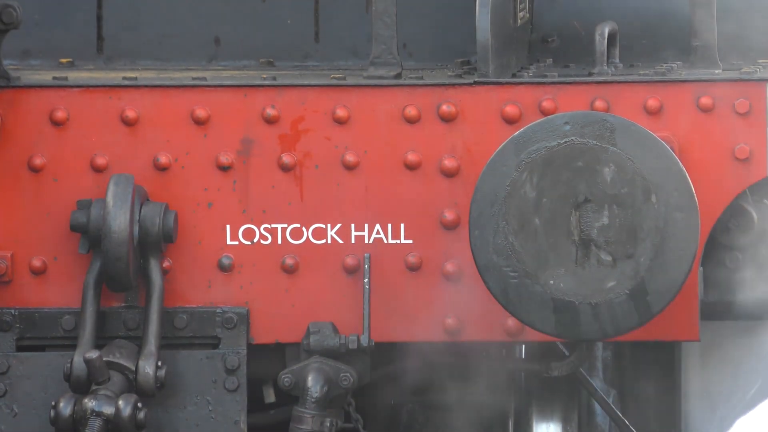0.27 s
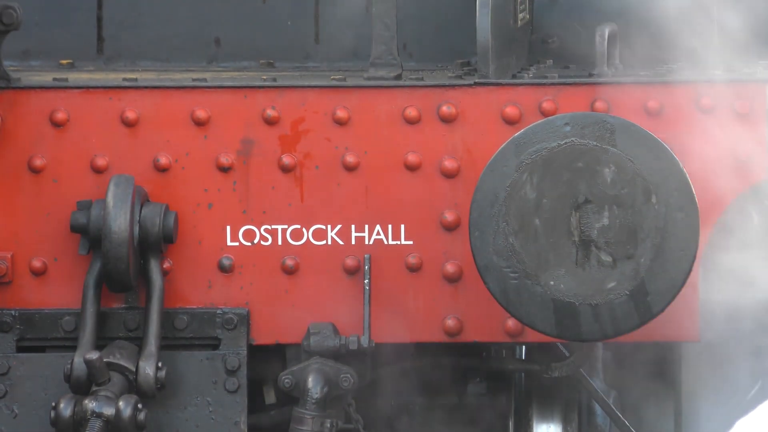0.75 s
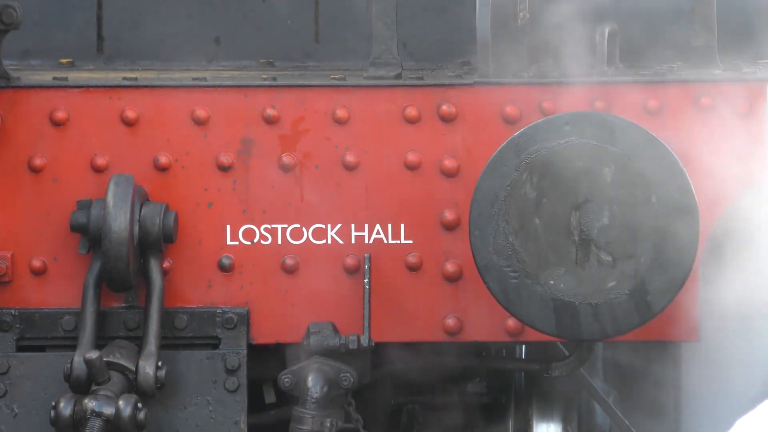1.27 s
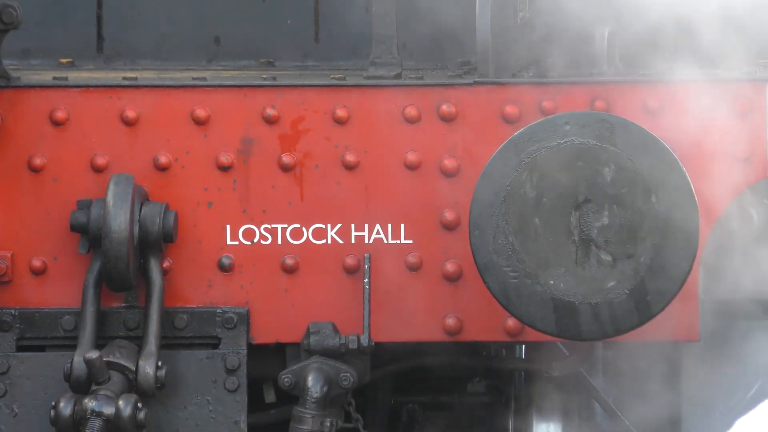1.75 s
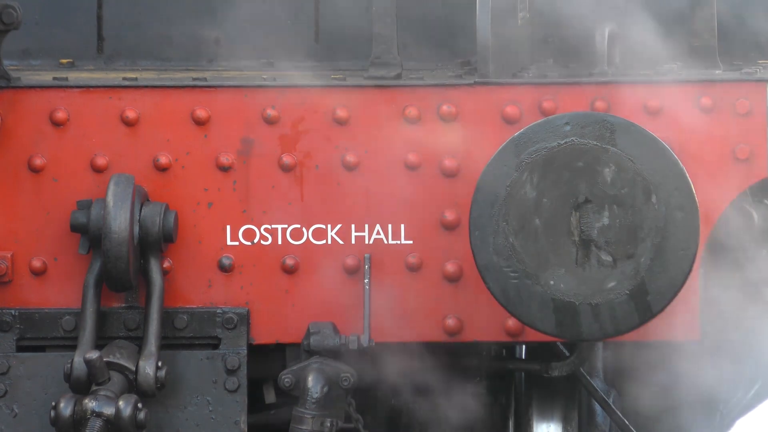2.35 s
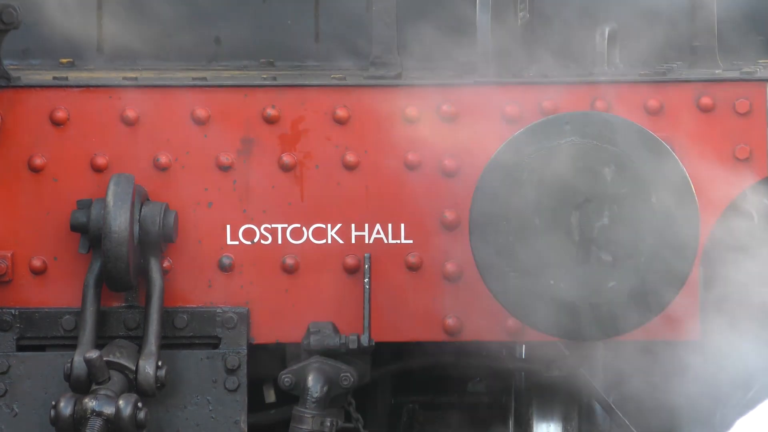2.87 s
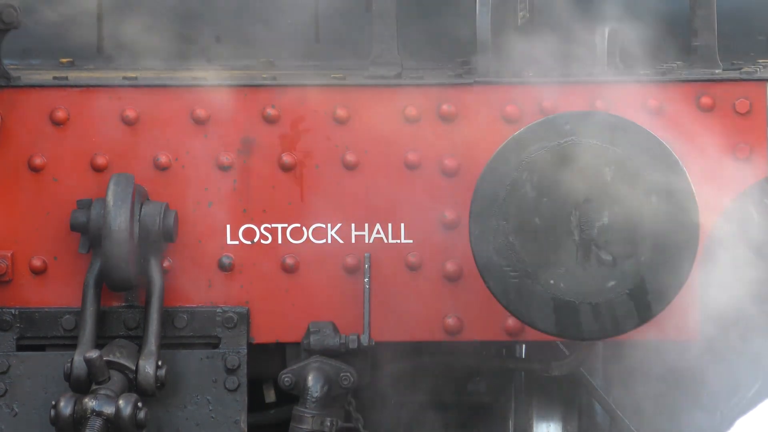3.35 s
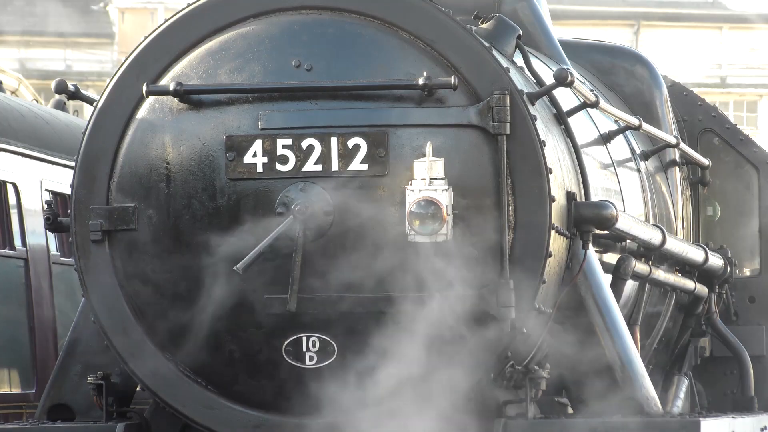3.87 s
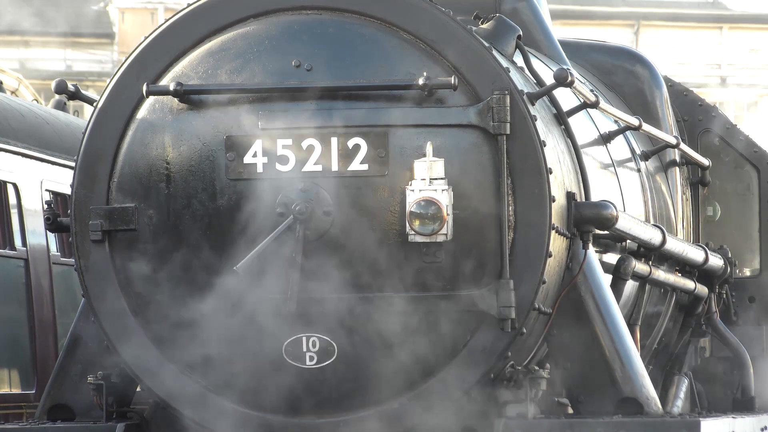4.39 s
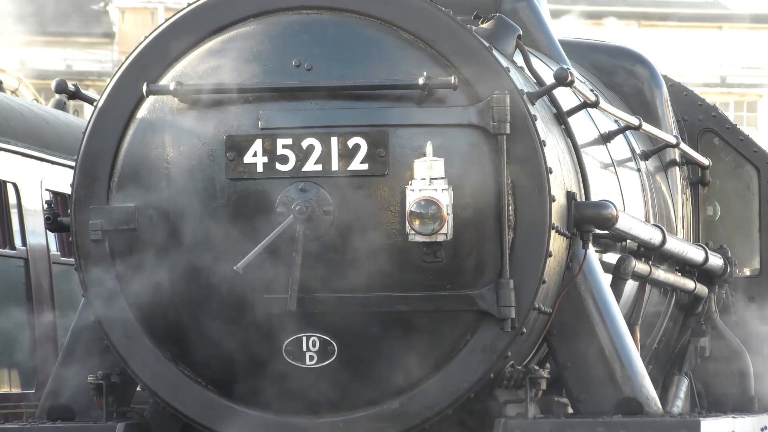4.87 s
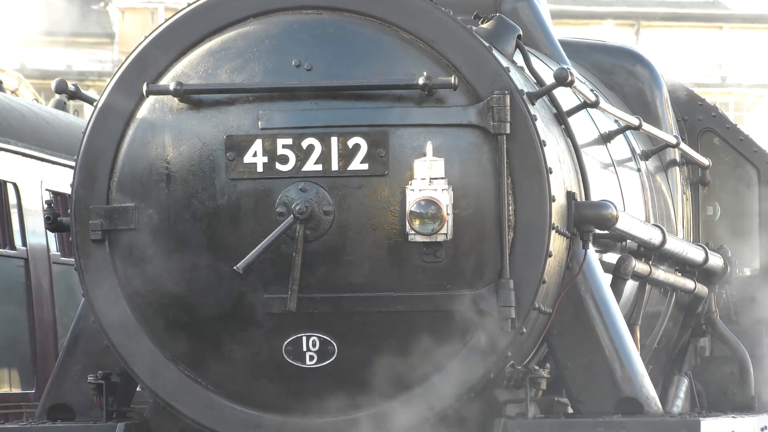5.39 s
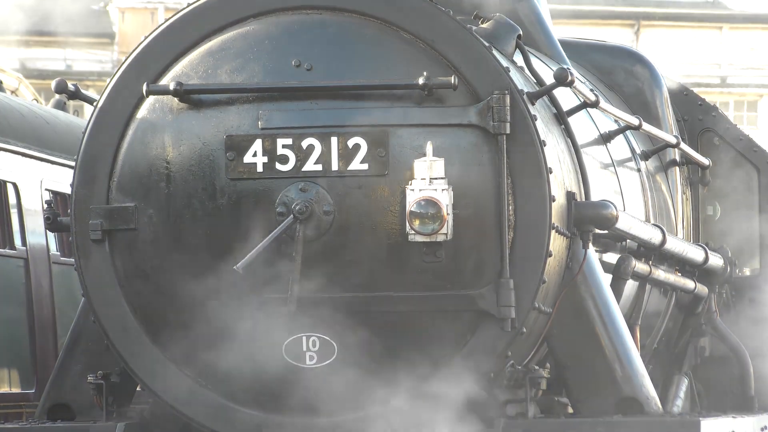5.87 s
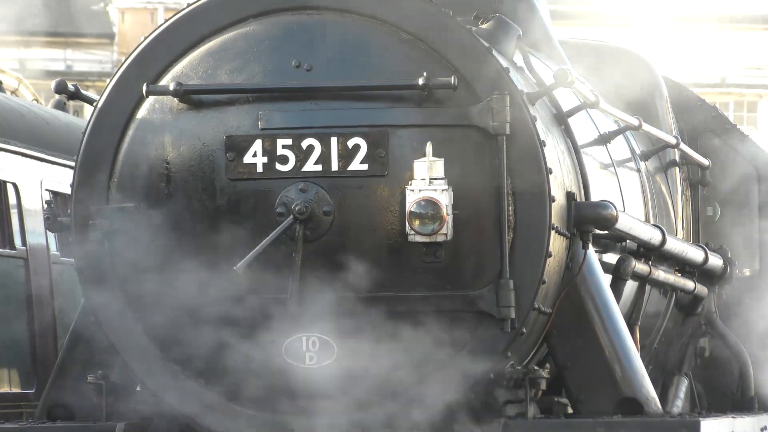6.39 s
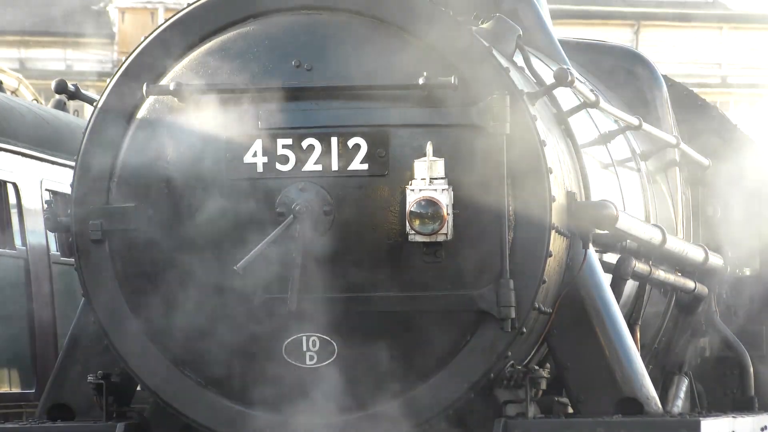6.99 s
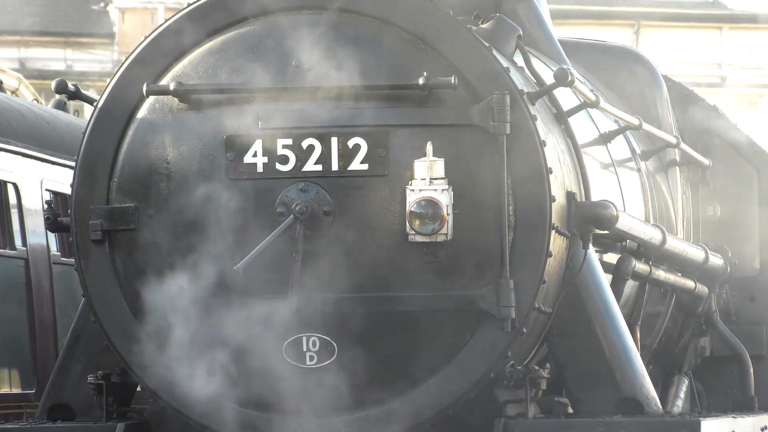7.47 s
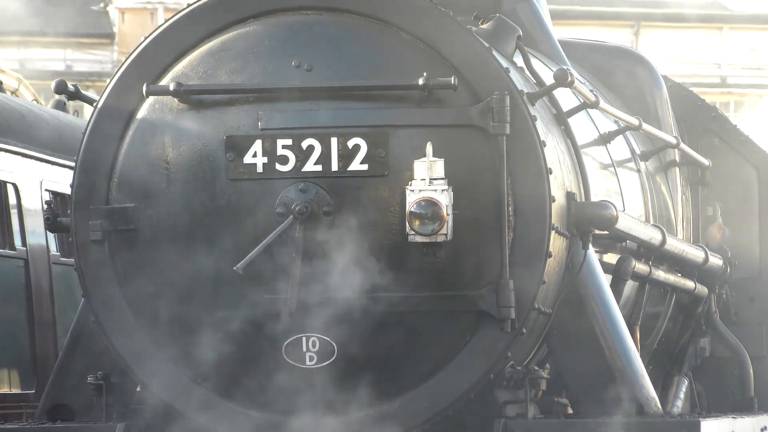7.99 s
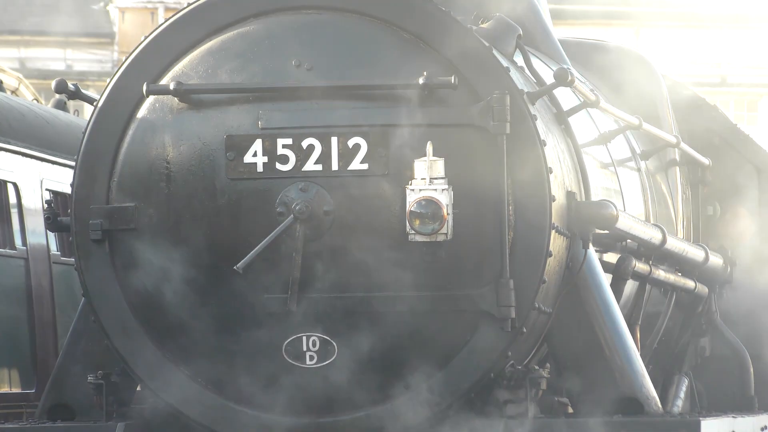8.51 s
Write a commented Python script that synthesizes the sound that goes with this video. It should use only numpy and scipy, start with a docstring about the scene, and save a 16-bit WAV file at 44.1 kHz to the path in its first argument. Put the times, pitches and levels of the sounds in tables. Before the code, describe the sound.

Close to a standing steam locomotive, wet steam hisses and sputters unevenly over a hollow draught roar, while wind buffets the microphone with low thumps.

```python
"""Just ahead of the buffer beam of a steam locomotive that stands in steam.
The draught, noise shaped by cavity resonances, roars hollowly in smokebox and chimney and swells late on.
Wet steam, as resonant noise, broad hiss and spray, spurts unevenly from a drain pipe and spits brief ticks.
Wind buffets the microphone as low-frequency noise and single pressure pulses."""
import sys
import numpy as np
from scipy import signal
from scipy.fft import rfft, irfft, next_fast_len
from scipy.io import wavfile
from scipy.ndimage import uniform_filter1d

SR = 44100
rng = np.random.default_rng(int(sys.argv[2]) if len(sys.argv) > 2 else 0)


def dump_mix(stems):
    """Bounce the given channels to the path in sys.argv[1] as a 16-bit WAV at rate SR."""
    frames = np.atleast_2d(stems).T  # one column per channel
    limited = np.clip(frames, -1, 1)  # hard clip at full scale
    pcm = np.round(limited * 32767).astype(np.int16)
    wavfile.write(sys.argv[1], SR, pcm)


N = 385434
TIME = np.arange(N) / SR   # s

# steady draught through the smokebox: (time [s], relative level [dB])
DRAUGHT_LEVEL = [(0.0, -45.5), (0.45, -45.5), (1.0, -47), (1.65, -50), (1.95, -46.2), (2.3, -46.5),
                 (3.5, -49.5), (4.5, -50.3), (4.85, -46), (5.5, -49.1), (5.95, -49.5), (6.5, -44.8),
                 (7.45, -45), (8.1, -49.5), (8.74, -49)]


def from_db(db):
    """Level and amplitude: 20 dB is a factor of ten in gain."""
    return 10 ** (np.asarray(db) / 20)


def rms_one(x):
    """Normalisation: the mean square is scaled to 1."""
    return x / np.sqrt(np.mean(x ** 2) + 1e-20)


def in_time(rows):
    """Linear interpolation: each column of a curve, sample by sample."""
    times, *columns = np.transpose(rows)
    return [np.interp(TIME, times, column) for column in columns]


def noise(gain_at):
    """Spectral shaping: Gaussian white noise times a gain at each frequency, at rms 1."""
    size = next_fast_len(N, True)
    hz = np.maximum(np.fft.rfftfreq(size, 1 / SR), 1)
    spectrum = rfft(rng.standard_normal(size)) * gain_at(hz)
    return rms_one(irfft(spectrum, size)[:N])


def coloured(spectrum):
    """Broadband turbulence: a smooth spectrum that falls 12 dB per octave beyond its ends."""
    at_hz, density_db = np.transpose(spectrum)

    def gain_at(hz):
        inside = from_db(np.interp(np.log(hz), np.log(at_hz), density_db))
        beyond_ends = np.minimum(1, np.minimum(hz / at_hz[0], at_hz[-1] / hz)) ** 2
        return inside * beyond_ends

    return noise(gain_at)


def passband(hz, centre_hz, width_hz):
    """Resonance: power response, 1 at the centre and one half at the edges of its width."""
    detuning = (hz ** 2 - centre_hz ** 2) / (hz * width_hz)
    return 1 / (1 + detuning ** 4)


def resonant(modes):
    """Cavity resonance: turbulence excites steep-sided modes, whose powers add."""
    def gain_at(hz):
        power = sum(from_db(db) ** 2 * passband(hz, centre_hz, width_hz)
                    for centre_hz, width_hz, db in modes)
        return np.sqrt(power)

    return noise(gain_at)


def drift(rate_hz):
    """Random modulation: low-passed noise wanders slowly with rms 1."""
    step = 100   # samples between the points of the slow curve
    white = rng.standard_normal(N // step + 1)
    hz = np.fft.rfftfreq(len(white), step / SR)
    slow = irfft(rfft(white) / (1 + (hz / rate_hz) ** 2), len(white))
    return np.interp(np.arange(N) / step, np.arange(len(white)), rms_one(slow))


def evened(x, seconds):
    """Envelope division: slow swells of the noise are taken out, so that the flow sets its level."""
    envelope = np.abs(signal.hilbert(x, next_fast_len(N))[:N])
    power = uniform_filter1d(envelope ** 2, max(int(seconds * SR), 1))
    return rms_one(x / np.sqrt(power + 1e-9))


def wandering(modes, depth_db, rate_hz, count):
    """Mode competition: interleaved groups of resonances trade strength while their sum stays even."""
    ringing = 0
    for k in range(count):
        group = modes[k::count]
        share = np.sqrt(sum(width_hz * from_db(db) ** 2 for hz, width_hz, db in group))
        ringing = ringing + share * resonant(group) * from_db(depth_db * drift(rate_hz))
    return evened(ringing, seconds=0.072)


def surging(steady_db, surges, rise_share, roundness=1.1):
    """Power addition: level [dB] of a steady flow plus surges (time [s], peak [dB], dying time [s])."""
    power = from_db(steady_db) ** 2
    for start_s, peak_db, dying_s in surges:
        # distance from the peak in dying times; the rise takes rise_share of that time
        away = np.maximum((start_s - TIME) / rise_share, TIME - start_s) / max(dying_s, 1e-3)
        near = away < 10
        power[near] += (from_db(peak_db) * np.exp(-away[near] ** roundness)) ** 2
    return 10 * np.log10(power)


def wind():
    """Turbulent pressure on a diaphragm: swings and flutter; an eddy is a push between two suctions."""
    # light breeze and its lulls: (time [s], relative level of the slow swings [dB])
    breeze = [(0.0, -57.1), (1.25, -39), (1.5, -47.5), (1.9, -43), (2.5, -38), (3.1, -54), (3.45, -37),
              (4.1, -45), (5.2, -39.5), (6.1, -45), (7.4, -41.8), (8.74, -39.3)]
    # gusts: (time [s], relative swing level [dB], relative flutter level [dB], dying time [s])
    gusts = [(0.01, -23.5, -43, 0.19), (0.46, -34.5, -48.5, 0.31), (0.91, -24, -49.5, 0.06),
             (1.21, -34, -45, 0.058), (1.94, -26, -49, 0.031), (2.12, -26.5, -54, 0.08),
             (3.87, -31, -56, 0.038), (4.38, -32.5, -49, 0.2), (4.69, -29, -49, 0.07),
             (4.89, -31, -49, 0.072), (5.3, -35, -54, 0.06), (5.61, -27.5, -38, 0.13),
             (6.28, -30, -41, 0.036), (6.45, -21, -30, 0.077), (6.63, -19, -32.5, 0.16),
             (6.89, -20.5, -54, 0.08), (7.08, -31.5, -46, 0.18), (7.86, -30.5, -45, 0.064),
             (8.1, -24.5, -32, 0.13), (8.32, -21, -52, 0.11)]
    # slow pressure swings: (frequency [Hz], relative density [dB])
    swing_spectrum = [(5, -17), (10, -2.5), (18, 7.5), (28, -26.5), (42, -20.5), (70, -44), (140, -43.5)]
    # faster flutter: (frequency [Hz], relative density [dB])
    flutter_spectrum = [(22, -18), (45, 2), (60, -5), (85, -13), (115, -21.5), (170, -28), (400, -68)]
    # single eddies that hit the microphone: (time [s], peak level [dB], length [s])
    eddies = [(6.439, -22.5, 0.0051), (8.114, -7, 0.02)]
    rise_share = 0.87   # rise time over dying time
    breeze_flutter_db = -19.5   # against the swings of the breeze

    breeze_db, = in_time(breeze)
    breeze_db = breeze_db + 2.0 * drift(rate_hz=9)
    swing_gusts = [(s, swing, dying) for s, swing, flutter, dying in gusts]
    flutter_gusts = [(s, flutter, dying) for s, swing, flutter, dying in gusts]
    swing_db = surging(breeze_db, swing_gusts, rise_share)
    flutter_db = surging(breeze_db + breeze_flutter_db, flutter_gusts, rise_share)
    pressure = from_db(swing_db + 0.6) * evened(coloured(swing_spectrum), seconds=0.062)
    pressure = pressure + from_db(flutter_db + 1.2) * evened(coloured(flutter_spectrum), seconds=0.16)
    for s, peak_db, length_s in eddies:
        passing = ((TIME - s) / length_s) ** 2
        pressure = pressure + from_db(peak_db) * (1 - 2 * passing) * np.exp(-passing)
    return pressure


def draught():
    """Flow noise in cavities: the fire drones in the boiler, the draught rushes through the smokebox."""
    # drone of the fire: (time [s], relative level [dB])
    fire_level = [(0, -45), (.5, -47), (1.5, -47), (3.5, -47.5), (4.7, -47), (5.5, -45), (6.3, -46.5),
                  (7.5, -45), (8.74, -45.8)]
    # resonances of firebox and boiler: (centre [Hz], width [Hz], relative density [dB])
    boiler_modes = [(211, 50, 1.5), (250.3, 45, -2), (305, 42, -5), (338.4, 28.4, -1), (456.4, 25, -11),
                    (502.6, 6.2, -8.5), (530.4, 31, -10.5), (585, 32, -13)]
    # resonances of the smokebox: (centre [Hz], width [Hz], relative density [dB])
    smokebox_modes = [(677, 18, -0.5), (710, 16, -4), (712, 16, -17), (856, 56, 2.5), (970, 7.6, -18),
                      (1084.4, 37, -0.5), (1149, 67, -4.5), (1197, 48, 0.5), (1327, 36, -12.5),
                      (1448, 46, -15), (1560, 210, -15.5)]
    # broad rush under the resonances: (frequency [Hz], relative density [dB])
    rush_spectrum = [(60, -14), (130, -9.5), (200, -10), (400, -11.5), (560, -16), (1000, -11.5),
                     (1350, -25.5), (1800, -18.5), (2300, -50), (3000, -22.5), (6000, -31.5)]

    level_db, = in_time(DRAUGHT_LEVEL)
    fire_db, = in_time(fire_level)
    boiler = from_db(fire_db - 0.24) * evened(resonant(boiler_modes), seconds=0.95)
    smokebox = from_db(level_db + 3) * evened(resonant(smokebox_modes), seconds=0.26)
    # the broad rush swells a little with the draught
    rush_db = -51.5 + 0.26 * (level_db - level_db.mean())
    rush = from_db(rush_db) * coloured(rush_spectrum)
    return boiler + smokebox + rush


def chimney(draught_share=0.33):
    """Blown pipe: breathy note and overtones rise with the blast; at its height it overblows and whistles."""
    # strength of the blast up the chimney: (time [s], strength [dB])
    blast = [(0.0, -46.5), (1.1, -44.5), (1.55, -47.5), (2.0, -45.5), (2.9, -43.3), (3.17, -41),
             (3.35, -46.1), (3.7, -43.5), (4.5, -43), (5.0, -44), (5.2, -38.5), (5.52, -44), (6.2, -42),
             (6.62, -36.5), (7.1, -39.5), (7.4, -36), (8.03, -38), (8.25, -41), (8.74, -42)]
    # main note: (centre [Hz], width [Hz], relative density [dB])
    note_modes = [(677, 43, -4.5), (737, 84, -1.5), (820, 107, 2.5), (899, 37, -6)]
    # overtones: (centre [Hz], width [Hz], relative density [dB])
    overtone_modes = [(1569, 43, 3), (1685, 79, -4.5), (1797, 72, -2.5), (1943, 38, -13.5),
                      (2420, 140, -12), (2553, 60, -6), (2650, 170, -19.5), (3350, 190, -14),
                      (4180, 67, -15)]
    # edge that whistles while it overblows: (centre [Hz], width [Hz], relative density [dB])
    whistle_modes = [(1587, 19, 0), (2560, 55, -12.5)]
    gentle_blast_db = -44
    # levels at a gentle blast, and the dB gained for each dB more
    note_start_db, note_growth = -46, 1.33
    overtone_start_db, overtone_growth = -58, 1
    # the overblowing: centre, half length (to 1/e), lift of the overtones, peak level of the whistle
    overblow_at_s, overblow_half_s, overblow_lift_db, whistle_db = 7.56, 0.69, 5, -50

    blast_db, = in_time(blast)
    draught_db, = in_time(DRAUGHT_LEVEL)
    harder_db = blast_db - gentle_blast_db
    overblowing = np.exp(-((TIME - overblow_at_s) / overblow_half_s) ** 2)
    note_db = note_start_db + note_growth * harder_db
    overtone_db = overtone_start_db + overtone_growth * harder_db
    overtone_db = overtone_db + draught_share * (draught_db - draught_db.mean())
    overtone_db = overtone_db + overblow_lift_db * overblowing
    note = from_db(note_db) * evened(resonant(note_modes), seconds=0.27)
    overtones = from_db(overtone_db) * evened(resonant(overtone_modes), seconds=0.21)
    whistle = from_db(whistle_db) * overblowing * evened(resonant(whistle_modes), seconds=0.08)
    return note + overtones + whistle


def spits(decay_s=0.0012, low_hz=5000):
    """Impulsive noise: each drop of condensate bursts in a tiny bright tick that decays exponentially."""
    # spitting drops: (time [s], relative level [dB])
    drops = [(6.445, -44), (7.257, -41)]
    bursts = sum(from_db(db) * (TIME >= s) * np.exp(-np.abs(TIME - s) / decay_s) for s, db in drops)
    ticks = bursts * rng.standard_normal(N) / 2
    highpass = signal.butter(2, low_hz, "high", fs=SR, output="sos")
    return signal.sosfilt(highpass, ticks + 1e-18)


def drain_pipe(spray_share=0.56):
    """Jet noise: wet steam sputters through the pipe's resonances; the open jet hisses and throws spray."""
    # leak between spurts: (time [s], relative hiss level [dB], relative throat level [dB])
    leak = [(0.0, -58, -52.5), (0.9, -54.5, -57.5), (1.55, -56.5, -57), (2.0, -54, -52.5),
            (2.3, -52.5, -56.5), (2.7, -51, -53.5), (3.3, -54.5, -57.0), (4.2, -53.5, -55.5),
            (4.8, -54.5, -53.5), (5.95, -55, -59), (6.5, -52.6, -52), (6.9, -50.5, -53.5),
            (7.9, -50.5, -57.5), (8.25, -54, -61.5), (8.74, -56, -58.5)]
    # spurts: (time [s], relative hiss level [dB], relative spray level [dB], dying time [s])
    spurts = [(0.03, -48.5, -65.5, 0.17), (0.47, -52, -70, 0.24), (0.68, -43, -79, 0.031),
              (1.76, -48, -73, 0.03), (1.85, -49.7, -71, 0.034), (1.94, -43.5, -63.5, 0.052),
              (2.03, -46.5, -76, 0.049), (2.69, -63, -68, 0.052), (2.81, -57, -65.5, 0.14),
              (2.98, -44.5, -72, 0.07), (3.37, -56, -74, 0.04), (4.14, -52, -75, 0.03),
              (4.85, -50.5, -76, 0.19), (5.22, -54, -64, 0.11), (5.35, -54, -64.5, 0.065),
              (5.66, -62, -69, 0.12), (5.95, -56, -68, 0.036), (6.69, -49, -70, 0.2),
              (6.97, -53, -67, 0.06), (7.54, -48.5, -67.5, 0.11)]
    # the drain's throat: (centre [Hz], width [Hz], relative density [dB])
    throat_modes = [(1934, 102, 6.5), (2105, 140, 3), (2340, 126, -5.5), (2542, 96, -1.5), (2820, 164, -3)]
    # overtones of the pipe: (centre [Hz], width [Hz], relative density [dB])
    pipe_modes = [(3270, 150, -1), (3667, 140, -0.5), (3880, 140, -2.5), (4540, 150, -3.5), (4880, 69, 2),
                  (4970, 140, -1.5), (5320, 220, 1.5), (5620, 77, 2), (5830, 114, 3), (6166, 110, 2),
                  (6500, 140, -1.5), (6920, 120, -0.5), (7620, 120, -1)]
    # broad hiss of the jet: (frequency [Hz], relative density [dB])
    hiss_spectrum = [(1200, 4.5), (2400, -1), (3050, -4), (4300, 2), (5000, -0.5), (6000, 3.5), (6800, 0.5),
                     (7400, 4), (8100, 3.5), (8750, 3), (9300, -8.5), (10300, -19), (15000, -38)]
    # its fine spray: (frequency [Hz], relative density [dB])
    spray_spectrum = [(5000, -1.5), (8000, -4.5), (9500, 0.5), (10500, -10), (11500, -4.5), (12500, -2),
                      (13700, -6), (14500, -9), (16000, -12)]
    rise_share = 0.95   # rise time over dying time
    leak_spray_db = -18.0   # level of the leak's spray before trims, against its hiss
    throat_follows = 0.2   # dB the throat gains for each dB of a spurt

    leak_db, throat_db = in_time(leak)
    hiss_spurts = [(s, hiss, dying) for s, hiss, spray, dying in spurts]
    spray_spurts = [(s, spray, dying) for s, hiss, spray, dying in spurts]
    ring_db = surging(leak_db, hiss_spurts, rise_share)
    spray_db = surging(leak_db + leak_spray_db, spray_spurts, rise_share)
    throat_db = throat_db + throat_follows * (ring_db - leak_db)
    # the harder the spurt, the more it sputters
    sputter_depth_db = 0.8 + 0.1 * np.maximum(ring_db - np.median(ring_db), 0)
    sputter_db = sputter_depth_db * drift(rate_hz=20)

    throat_tone = wandering(throat_modes, depth_db=3.0, rate_hz=3.7, count=2)
    throat = from_db(throat_db + 1.0 + 1.04 * drift(rate_hz=12)) * throat_tone
    ring_tone = wandering(pipe_modes, depth_db=3.5, rate_hz=9.4, count=5)
    ring = from_db(ring_db - 3.0 + 1.43 * drift(rate_hz=22)) * ring_tone
    # the open jet grows with both the flow and the spray
    jet_db = (1 - spray_share) * ring_db + spray_share * spray_db
    hiss = from_db(jet_db + 9.0 + 0.72 * drift(rate_hz=34)) * coloured(hiss_spectrum)
    spray = from_db(spray_db + 5.5 + 1.1 * drift(rate_hz=14)) * coloured(spray_spectrum)
    return (throat + ring + hiss + spray) * from_db(sputter_db)


def scene():
    """Superposition: the pressures of wind and engine add at one microphone."""
    return (wind() + draught() + chimney() + spits() + drain_pipe())[None]


def record(dry):
    """Band limiting: a steep elliptic low-pass cuts the top."""
    cutoff_hz = 15700
    # order 10, 0.1 dB ripple, 90 dB stopband
    lowpass = signal.ellip(10, 0.1, 90, cutoff_hz, fs=SR, output="sos")
    return signal.sosfilt(lowpass, dry)


dry = scene()
out = record(dry)
dump_mix(out)
```